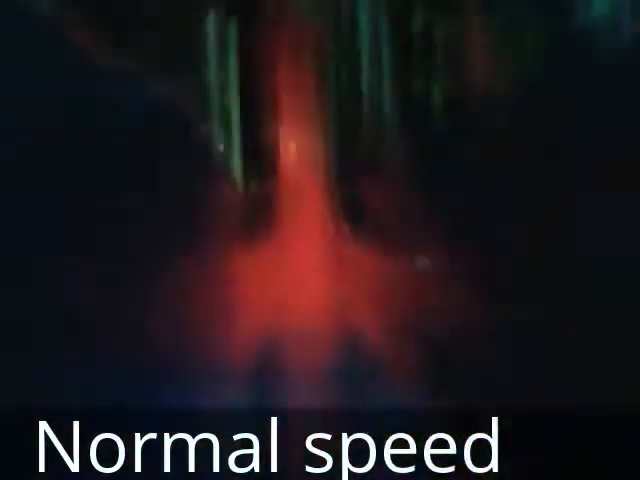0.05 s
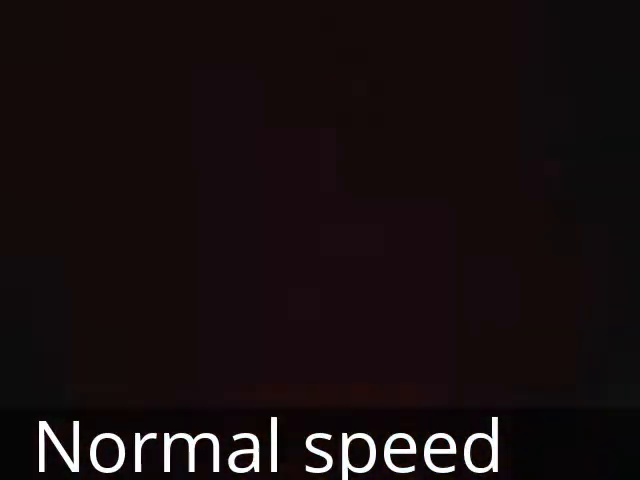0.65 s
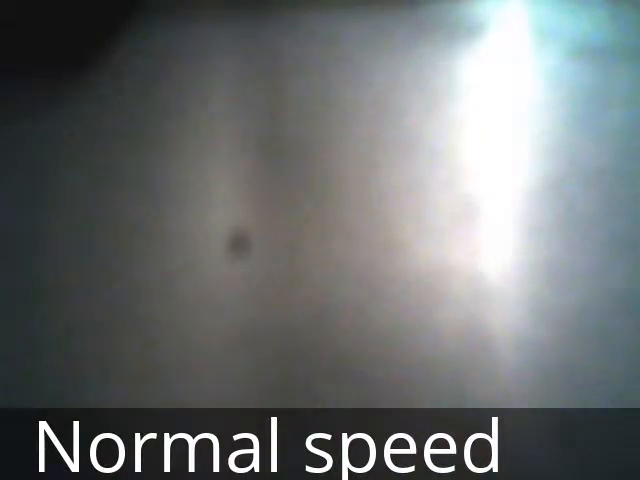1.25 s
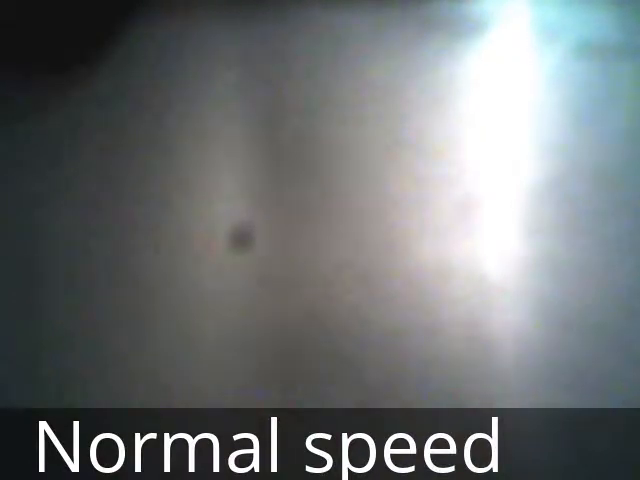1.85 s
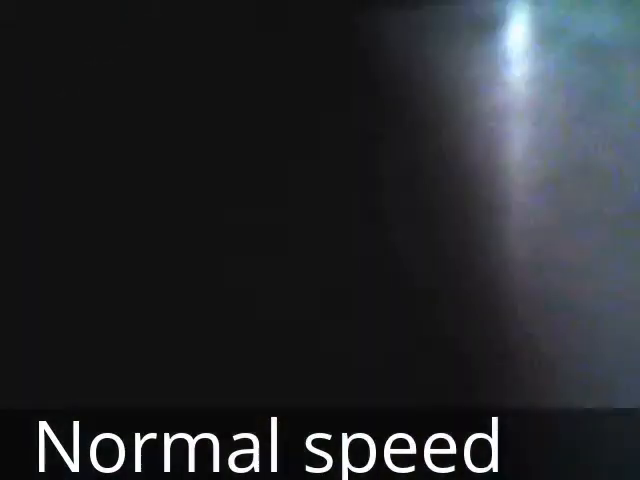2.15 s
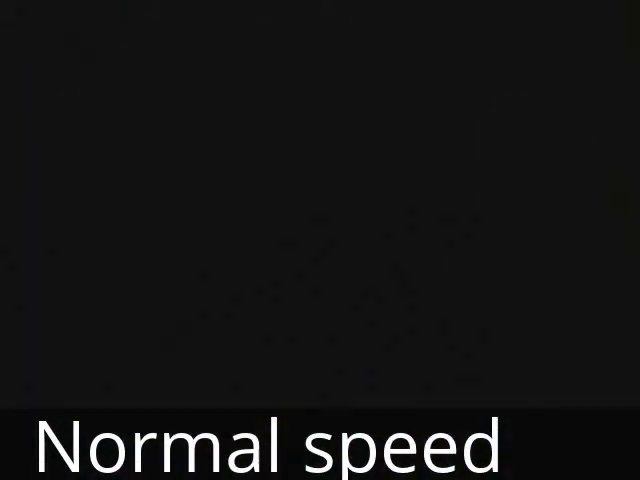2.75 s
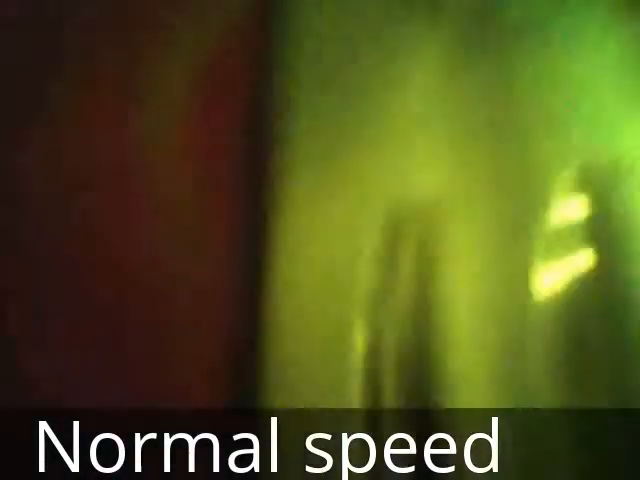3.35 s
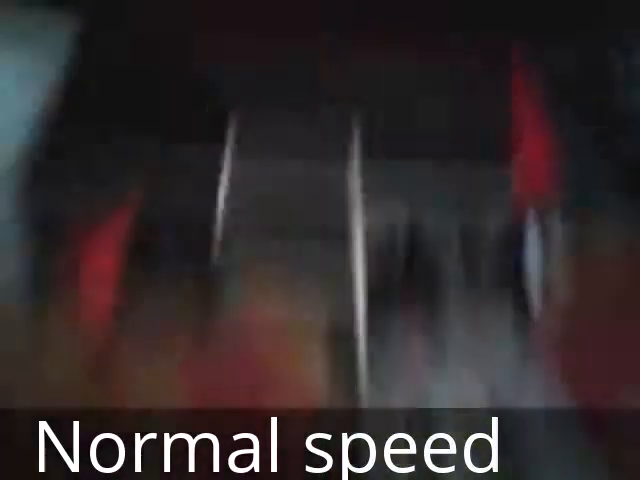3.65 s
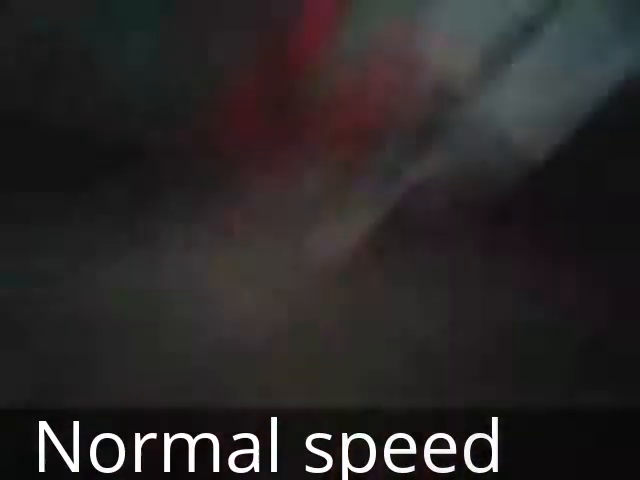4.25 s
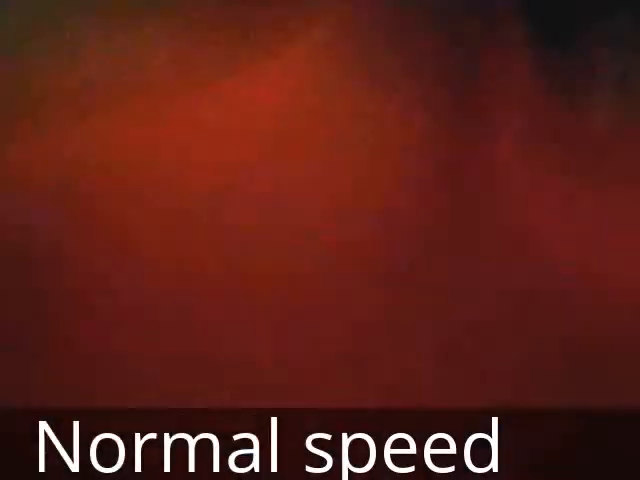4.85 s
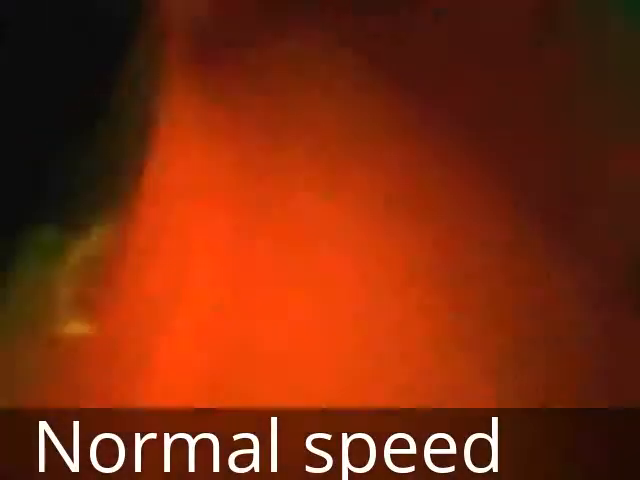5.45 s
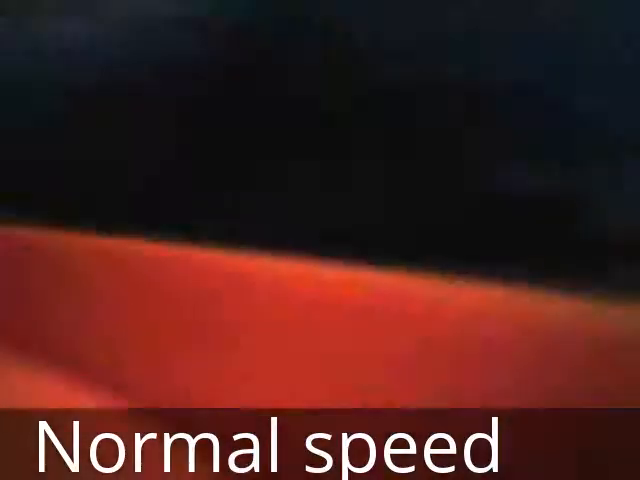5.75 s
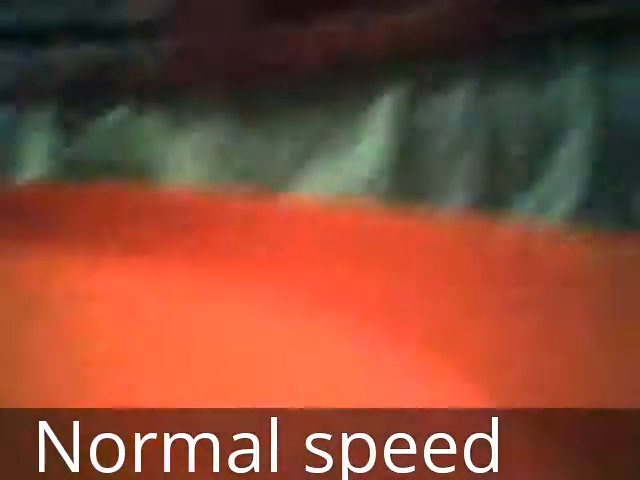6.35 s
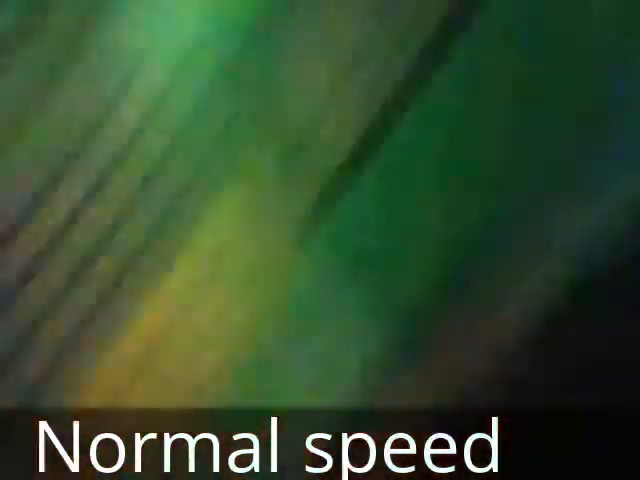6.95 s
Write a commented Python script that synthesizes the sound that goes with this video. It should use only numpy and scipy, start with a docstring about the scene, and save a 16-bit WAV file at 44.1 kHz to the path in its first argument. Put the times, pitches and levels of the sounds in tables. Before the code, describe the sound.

Loud plastic rattling and sharp knocks come from a toy car speeding along its track, picked up through the car's own body by a tiny, lo-fi microphone. The rolling gives way to the fast ticking and faint hum of a small motor lift. Clicks and bumps follow as the car is tipped off, then it runs down a boxy ramp and rattles on with a slight squeal, easing briefly before a last burst.

```python
"""A toy car races along plastic track: its wheels rattle and squeal, its chassis knocks on joints and walls.
From 1 s a geared motor lift carries it, humming and ticking; near 2.6 s its ratchet ticks three times.
The lift tips the car off, and near 3.9 s it drums down a hollow ramp, takes a fast bend, coasts and ends
in a last burst. Throughout, the sound is structure-borne: it travels through the plastic to the
narrow-band microphone of a tiny camera on the chassis, which overloads at speed."""
import sys
import numpy as np
from scipy import signal
from scipy.fft import rfft, irfft
from scipy.io import wavfile

SR = 44100
rng = np.random.default_rng(int(sys.argv[2]) if len(sys.argv) > 2 else 0)


def unload_audio(sound):
    """Save the sound as a 16-bit wav file, at the path given as the first command line argument."""
    columns = np.transpose(np.atleast_2d(sound))
    # keep every value between -1 and 1, then stretch to whole-number steps
    steps = np.round(np.clip(columns, -1, 1) * 32767)
    wavfile.write(sys.argv[1], SR, steps.astype(np.int16))


N = 318402
T = np.arange(N) / SR

# Rolling, one table a run: t/s, rattle level/dB, rumble re rattle/dB, track flexing re rattle/dB
ROLLING_LEVELS = [
    [(0.0, -7, -6.5, -5), (0.2, -6.5, -10.5, -10.5), (0.26, -12.5, -7.5, -4), (0.38, -10, -9, -4.5),
     (0.49, -18, -12, -6.5), (0.62, -11, -5, -7), (0.76, -18, -2.5, -6), (0.9, -9.5, -11.5, -19),
     (1.058, -28, -11, -15)],
    [(3.85, -25.5, 0, -20), (3.98, -11, -5, -11), (4.05, -17.5, -6, -3), (4.12, -18, -9, -9),
     (4.24, -7, -8.5, -9), (4.31, -13, -7, -11), (4.43, -7.5, -4, -10), (4.49, -15, -8, -14),
     (4.69, -9.5, -9, -5), (4.77, -4.5, -9, -5), (5.02, -8, -10.5, -16), (5.36, -7.5, -11.5, -13),
     (5.56, -4, -7.5, -0.5), (5.73, -11, -12.5, -28), (5.83, -8, -8.5, -12), (5.89, -18, -12.5, -21),
     (5.94, -15, -12.5, -28), (6.06, -18, -9.5, -9), (6.2, -15, -11.5, -21), (6.45, -17.5, -10, -6),
     (6.52, -6.5, -7, -9), (6.65, -7.5, -8, -16), (6.7, -10.5, -10.5, -2), (6.82, -8, -10, -6),
     (6.9, -13.5, -10.5, -6.5), (7.22, -6.5, -7.5, -2.5)],
]
# Responses of the track, the chassis, the flexing track and the rumble: f/Hz, relative level/dB
TRACK_RESPONSE = [(1200, -15), (1600, -6), (2000, -3), (2600, 2.5), (3000, 2.5), (3400, 1.5), (3800, 4.5),
                  (4200, -5)]
CHASSIS_RESPONSE = [(1200, -14), (1650, -4.5), (2050, -1), (2200, -4.5), (2420, 0), (2750, 0), (3050, -5.5),
                    (3250, -4), (3500, -9), (3750, -3), (3950, -9.5), (4200, -16.5)]
FLEX_RESPONSE = [(1000, -10), (1500, -4), (2050, 2), (2400, -5), (3000, -10.5)]
RUMBLE_RESPONSE = [(15, 9.5), (35, -0.5), (80, -2.5), (200, -1.5), (400, -2), (800, -1.5), (1200, -1.5),
                   (1600, -7.5), (2400, -34.5)]
def wheels(rattle_db=-0.53, flex_db=-3, chassis_db=-9):
    """Rolling noise: bouncing wheels force track and chassis into vibration, and rub the walls at speed."""
    level, rumble_level, flex_level = np.sum([envelopes(run) for run in ROLLING_LEVELS], axis=0)
    on_ramp = (T > RAMP_LEVELS[0][0]) * (T < RAMP_LEVELS[-1][0])
    rumble_level *= gain_of(-3.5 * on_ramp)  # the stiff ramp rumbles less than loose track
    contact = chatter(per_s=115, jitter=0.5, spread_db=3.5, t60=0.019, scrape=0.59, rise=0.0017)
    track_force, chassis_force, rumble_force, flex_force = contact * grip() * rng.standard_normal((4, N))
    track = resonate(track_force * level, TRACK_RESPONSE)
    chassis = gain_of(chassis_db) * resonate(chassis_force * level, CHASSIS_RESPONSE)
    flexing = gain_of(flex_db) * resonate(flex_force * flex_level, FLEX_RESPONSE)
    rumble = resonate(rumble_force * rumble_level, RUMBLE_RESPONSE)
    return gain_of(rattle_db) * (track + chassis) + flexing + rumble + wall_squeal(level)


def grip(hop_s=0.022, hop_db=-3.5):
    """Contact loss: the rolling car hops just before each knock, so the gain of the wheel contact dips."""
    lifted = np.zeros(N)
    hop = np.sin(np.pi * np.arange(0, 1, 1 / (hop_s * SR)))
    for s, *_ in IMPACTS:
        add(lifted, s - hop_s, hop)
    return gain_of(hop_db * np.minimum(lifted, 1))


def wall_squeal(level, db=-6, hz=3050, glide=0.1, rasp=0.065):
    """Friction: rubbing gives a sliding tone, and only a hard run presses the car on to the wall."""
    rub = tone(hz * np.exp(glide * wander(22.06) + rasp * wander(397.5)))
    pressure = np.tanh(level / 0.11)
    flicker = np.abs(1 + 0.35 * wander(25))
    return gain_of(db) * level * pressure * flicker * rub


# Knocks on joints and walls, and three quick ratchet ticks of the lift near 2.6 s:
# t/s, level/dB, thud re level/dB, clatter and thud T60/s, ring f/Hz
IMPACTS = [(0.1022, -3, -18, 0.06, 2980), (0.3486, 3.5, -9, 0.031, 2850), (0.5724, -5.5, -8, 0.2, 2830),
           (0.609, 11, -11, 0.013, 2800), (0.674, -4.5, -6, .06, 2810), (0.69, -3.5, -14, 0.15, 3040),
           (0.7655, -6, -15, 0.12, 3650), (0.82, -3.5, -11, 0.074, 3020), (0.8869, -3, -5.5, 0.038, 3720),
           (0.996, -11.5, -1, 0.024, 3940), (2.586, -0.5, -3, 0.014, 3280), (2.6132, -8, -25, .02, 3880),
           (2.6254, -9, -23, 0.017, 3870), (2.6364, -6, -20, 0.013, 3830), (3.0156, -6.5, -33, 0.04, 2640),
           (3.0761, -4.5, -4, 0.066, 2440), (3.1093, -8, -15, 0.051, 2860), (3.125, -6, -4.5, 0.025, 3190),
           (3.1477, -8, -6, 0.026, 3690), (3.2195, -5, -9, 0.016, 3770), (3.2673, -8.5, -14, 0.042, 3020),
           (3.302, -6, -3, 0.024, 3900), (3.3158, -2, -24, 0.059, 3130), (3.409, -8.5, -7, 0.02, 3570),
           (3.46, -5, -20, 0.012, 3610), (3.4682, -1.5, -13, 0.016, 3380), (3.5018, -5, -9, 0.036, 3760),
           (3.548, -8.5, -9.5, 0.078, 3820), (3.5596, -10, -21, 0.034, 3900), (3.5835, -8, -25, 0.02, 3100),
           (3.608, -1, -8, 0.018, 2820), (3.8912, 0, -12.5, 0.073, 2720), (3.9255, -2, -16, 0.034, 3070),
           (3.9642, 6, -18, 0.033, 3030), (4.026, -7.5, -17, 0.044, 2960), (4.0747, 1.5, -9, 0.024, 2670),
           (4.14, -8.5, -9, 0.12, 3750), (4.1806, -1, -12, 0.069, 3000), (4.243, -2, -5.5, 0.065, 2640),
           (4.34, -1.5, -17, 0.046, 2780), (4.543, -3, -11.5, 0.11, 2730), (4.573, -4.5, -11, 0.047, 3180),
           (4.6226, -0.5, -8, 0.04, 2760), (4.7432, 3, -12, 0.056, 3120), (5.748, 6, -11, 0.027, 3120),
           (5.787, -7, -8, 0.05, 3100), (5.904, -8, 0.5, 0.031, 3150), (5.9956, -2.5, -19, 0.037, 2920),
           (6.041, -7, -19, 0.038, 3380), (6.2584, -1.5, -13.5, .055, 3610), (6.3081, 1, -11, 0.019, 3015),
           (6.3412, -1, -11.5, 0.035, 3500), (6.3996, -3, -13, 0.073, 3510), (6.4185, -3, -26, 0.016, 3840),
           (6.4725, -7.5, -12, 0.045, 3730), (6.755, -9, -4, 0.13, 2880), (6.966, -2, -11, 0.12, 2580),
           (7.0323, 1.5, -9, 0.073, 3300), (7.1422, -2, -5, 0.082, 2700)]
# Low response to a blow: f/Hz, relative level/dB
THUD_RESPONSE = [(30, -7), (150, -5.5), (300, -3), (800, -2), (1200, -3.5), (2000, -15.5)]
def impacts(clatter_db=-1, ring_db=-1, rise=0.00041, graze_db=-14, graze_s=0.0039, lead_s=0.02):
    """Impact excitation: each blow gives a clatter of loose parts, a thud and a ring of the struck part."""
    clatter, thud, rings = np.zeros((3, N))
    t = np.arange(SR // 6) / SR - lead_s
    # the parts graze before they strike, so the clatter swells to its peak
    graze = gain_of(graze_db) * np.exp(np.minimum(t, 0) / graze_s)
    strike = (1 + np.tanh(t / (2 * rise) - 0.5)) / 2
    for s, db, thud_db, t60, hz in IMPACTS:
        blow = gain_of(db - 60 * np.maximum(t, 0) / t60) * np.maximum(strike, graze)
        add(clatter, s - lead_s, gain_of(clatter_db) * blow)
        add(thud, s - lead_s, gain_of(thud_db) * blow)
        add(rings, s, gain_of(db + ring_db) * mode(hz, t60=0.019, rise=0.00038))
    return rings + driven_noise(clatter, TRACK_RESPONSE) + driven_noise(thud, THUD_RESPONSE)


# Bumps of the car body: t/s, level/dB, f/Hz, T60/s
LANDINGS = [(.319, -2.5, 250, 0.022), (3.107, -0.5, 766, 0.014), (3.127, -28, 694, 0.012),
            (3.266, 5, 766, 0.0072), (3.504, 1, 520, 0.01), (3.598, -3, 262, 0.019),
            (3.936, -8.5, 650, 0.041), (4.362, -5, 760, .03), (4.486, -11, 828, 0.11)]
def bumps():
    """Free vibration: each heavy landing rings one damped mode of the hollow body."""
    out = np.zeros(N)
    for s, db, hz, t60 in LANDINGS:
        add(out, s, gain_of(db) * mode(hz, t60, rise=0.00061))
    return out


# Drumming of the ramp below the lift: t/s, level/dB
RAMP_LEVELS = [(3.88, -38), (3.95, -24), (4.05, -33), (4.15, -26), (4.25, -21), (4.36, -21.5), (4.44, -25),
               (4.52, -19), (4.58, -26)]
# Response of the ramp: f/Hz, relative level/dB
RAMP_RESPONSE = [(400, -8), (620, 0.5), (800, -0.5), (1150, -2), (1450, -6)]
def ramp(drum_db=-1):
    """Resonance: the hollow moulded ramp answers the wheels with a boxy drumming."""
    level, = envelopes(RAMP_LEVELS)
    contact = chatter(per_s=130, jitter=0.31, spread_db=0.5, t60=0.025, scrape=0.33)
    return gain_of(drum_db) * driven_noise(level * contact, RAMP_RESPONSE)


# The lift climbs, slips, takes the load again, idles while tipping the car, pushes it off: t/s, level/dB
LIFT_LEVELS = [(1.0, -29), (1.04, -28), (1.13, -20.5), (1.55, -19), (2.56, -18.5), (2.67, -26.5),
               (2.83, -19.5), (2.99, -18), (3.04, -24), (3.19, -26.5), (3.64, -27.5), (3.73, -21),
               (3.88, -21.5)]
# Response to the shaking of the lift: f/Hz, relative level/dB
SHAKE_RESPONSE = [(15, -6), (50, -4.5), (85, -5), (135, 0.5), (250, 2), (380, 2.5), (580, 2.5), (800, 3),
                  (960, -1.5), (1300, 1.5), (2000, -18.5)]
def lift(ring_db=-9, shake_db=-23.5, climbing_db=-18.5):
    """Forced vibration: the gear train chatters through the chassis, rings its top mode and shakes it."""
    level, = envelopes(LIFT_LEVELS)
    teeth = chatter(per_s=110, jitter=0.25, spread_db=4, t60=0.015, scrape=0.97, rise=0.0011)
    gears = driven_noise(teeth * level, CHASSIS_RESPONSE)
    top_mode = tone(CHASSIS_MODES[-1][0] + 150 * wander(300))
    strikes = chatter(per_s=79, jitter=0.31, spread_db=9.5, t60=0.011, scrape=0.05, rise=0.0012)
    ringing = gain_of(ring_db) * level * top_mode * strikes
    shake_level = gain_of(shake_db) * (level / gain_of(climbing_db)) ** 0.98
    shake = driven_noise(shake_level * unit_rms(teeth + 0.36), SHAKE_RESPONSE)
    return gears + ringing + shake


# Gears on the lift's drive shaft: number of teeth, tick level re lift level/dB
SHAFT_GEARS = [(3, 9.5), (4, 7.5)]
# Modes of the chassis under a gear tooth: f/Hz, relative level/dB, T60/s
CHASSIS_MODES = [(610, -28, 0.029), (1900, -14.5, 0.0084), (2450, -5.5, 0.014), (2770, -9, 0.014),
                 (3727, 4, 0.014)]
def gear_ticks(shaft_hz=20.97, backlash_s=0.0017, spread_db=3, detune=0.025, uneven_db=2.5):
    """Backlash: play in the mesh makes each tooth early or late, soft or hard; load makes it louder."""
    out = np.zeros(N)
    load_times, load_db = np.transpose(LIFT_LEVELS)
    for teeth, gear_db in SHAFT_GEARS:
        times = np.arange(load_times[0], load_times[-1], 1 / (teeth * shaft_hz))
        chance = rng.standard_normal((len(times), 1 + len(CHASSIS_MODES), 2))
        for s, ((late, hard), *spots) in zip(times, chance):
            db = np.interp(s, load_times, load_db) + gear_db + spread_db * np.tanh(hard)
            # each tooth strikes a slightly different spot
            for (hz, mode_db, t60), (shift, weight) in zip(CHASSIS_MODES, spots):
                tick = mode(hz * (1 + detune * shift), t60, rise=0.0013)
                strength = gain_of(db + mode_db + uneven_db * np.tanh(weight))
                add(out, s + backlash_s * late, strength * tick)
    return out


# Partials of the lift motor: f/Hz, level/dB, rms deviation of f/Hz
MOTOR_PARTIALS = [(75.4, -40, 7), (94.3, -43, 8.8), (199.4, -38.5, 2.5), (591, -38.5, 6), (810, -41.5, 8)]
def motor(start=1.0, stop=3.85, fade_s=0.06, depth=0.55):
    """Random modulation: each partial of the motor's hum wavers in amplitude and frequency."""
    running = np.clip(np.minimum(T - start, stop - T) / fade_s, 0, 1)
    hum = np.zeros(N)
    for hz, db, waver_hz in MOTOR_PARTIALS:
        amplitude = gain_of(db) * (1 + depth * wander(4.9))
        hum += amplitude * tone(hz + waver_hz * wander(14))
    return running * hum


def chatter(per_s, jitter, spread_db, t60, scrape, rise=0.00079):
    """Intermittent contact: an envelope of uneven, quickly decaying blows over a steady scrape."""
    count = np.cumsum(per_s * np.exp(jitter * wander(per_s))) / SR
    onsets = np.diff(np.floor(count), prepend=0) > 0
    blows = onsets * gain_of(spread_db * np.clip(rng.standard_normal(N), -2, 1.5))
    decaying = signal.lfilter([1], [1, -gain_of(-60 / (t60 * SR))], blows)
    rounded = signal.lfilter([1], [1, -np.exp(-1 / (rise * SR))], decaying)
    return unit_rms(unit_rms(rounded) + scrape)


def mode(hz, t60, rise):
    """Damped oscillator: one mode of the plastic swells as the contact builds, then decays."""
    t = np.arange(0, 2 * t60, 1 / SR)
    attack = 1 - np.exp(-(t / rise) ** 2)
    return gain_of(-60 * t / t60) * attack * np.sin(2 * np.pi * (hz * t + rng.random()))


def resonate(force, response):
    """Convolution: the plastic acts as a minimum-phase filter with an impulse response of unit energy."""
    hz, db = np.transpose(response)
    f = np.abs(np.fft.fftfreq(4096, 1 / SR)) + 1
    octaves_outside = np.maximum(np.log2(hz[0] / f), 0) + np.maximum(np.log2(f / hz[-1]), 0)
    gain = gain_of(np.interp(np.log(f), np.log(hz), db) - 40 * np.minimum(octaves_outside, 2))
    spectrum = np.exp(np.conj(signal.hilbert(np.log(gain))))
    impulse = np.fft.ifft(spectrum).real[:len(f) // 2]
    return signal.oaconvolve(force, impulse / np.linalg.norm(impulse))[:N]


def driven_noise(envelope, response):
    """Broadband excitation: white noise under an envelope drives the plastic."""
    return resonate(envelope * rng.standard_normal(N), response)


def envelopes(rows, fade_s=0.014):
    """Gains along a level curve, silent outside it: the main layer, then those relative to it."""
    s, db, *relative_db = np.transpose(rows)
    gate = np.clip(1 + np.minimum(T - s[0], s[-1] - T) / fade_s, 0, 1)
    return [gate * gain_of(np.interp(T, s, db + offset)) for offset in [0, *relative_db]]


def wander(hz):
    """Random fluctuation of rms 1, low-passed at hz."""
    rolloff = 1 + (np.fft.rfftfreq(N, 1 / SR) / hz) ** 4
    return unit_rms(irfft(rfft(rng.standard_normal(N)) / rolloff, N))


def tone(hz):
    """A sine whose phase is the integral of its frequency."""
    return np.sin(2 * np.pi * np.cumsum(hz) / SR)


def lowpass(x, hz, taps):
    """Steep linear-phase low-pass."""
    return signal.oaconvolve(x, signal.firwin(taps, hz, window=("kaiser", 8), fs=SR), "same")


def gain_of(db):
    """Decibels to amplitude."""
    return 10 ** (np.asarray(db) / 20)


def unit_rms(x):
    """Scales to an rms of 1."""
    return x / np.sqrt(np.mean(x ** 2) + 1e-20)


def add(mix, s, sound):
    """Mixes a sound in at time s."""
    part = mix[max(round(s * SR), 0):][:len(sound)]
    part += sound[:len(part)]


def scene():
    """Superposition: every source reaches the one microphone through the car itself."""
    return (wheels() + ramp() + lift() + gear_ticks() + motor() + impacts() + bumps())[None]


def record(dry, ceiling=0.65, band_hz=4130, dull_hz=14000, edge_hz=15830):
    """Nonlinear distortion: the narrow-band microphone saturates, and the remaining peaks clip flat."""
    saturated = dry[0] / (1 + (dry[0] / ceiling) ** 4) ** (1 / 4)
    narrow = lowpass(saturated, band_hz, taps=401)
    clipped = np.clip(narrow, -0.81, 0.63)  # sooner on the positive side
    dulled = signal.lfilter(*signal.butter(1, dull_hz, fs=SR), clipped)
    return lowpass(dulled, edge_hz, taps=511)[None]


dry = scene()
out = record(dry)
unload_audio(out)
```